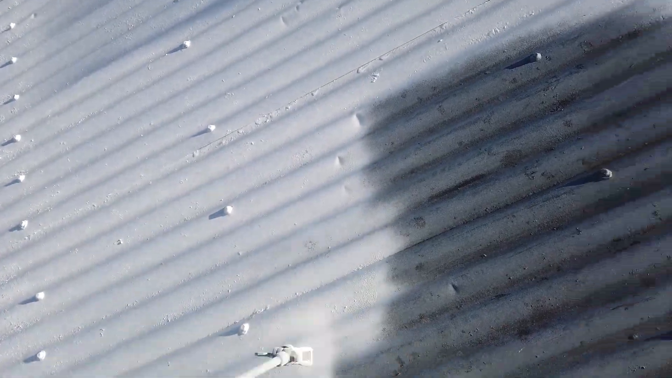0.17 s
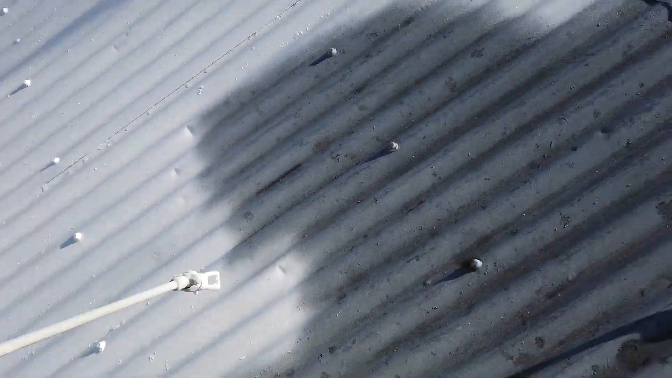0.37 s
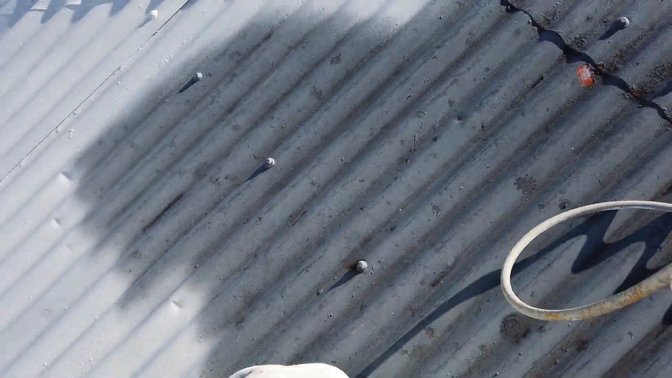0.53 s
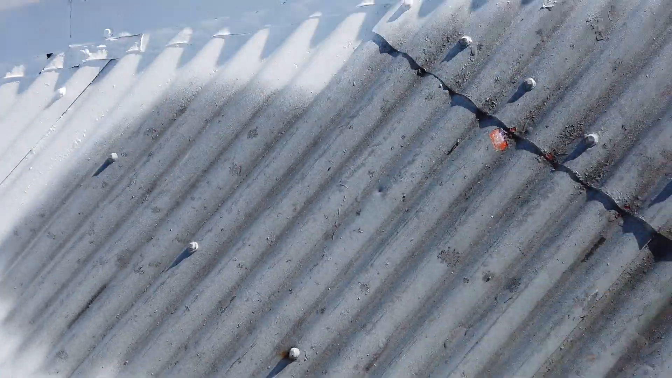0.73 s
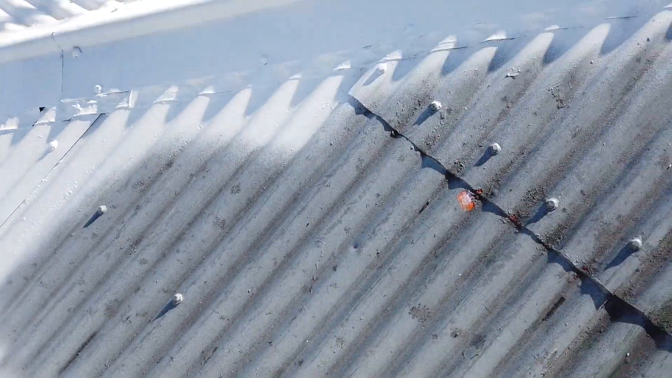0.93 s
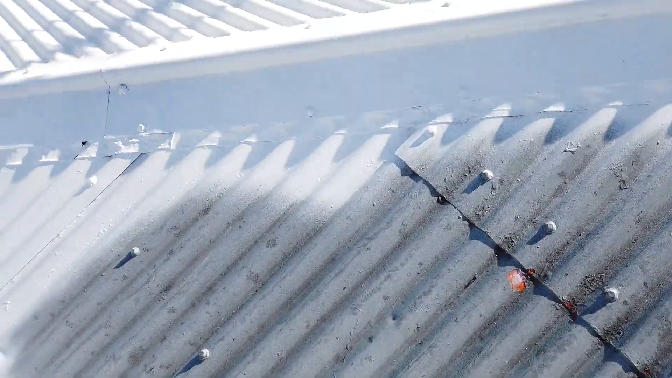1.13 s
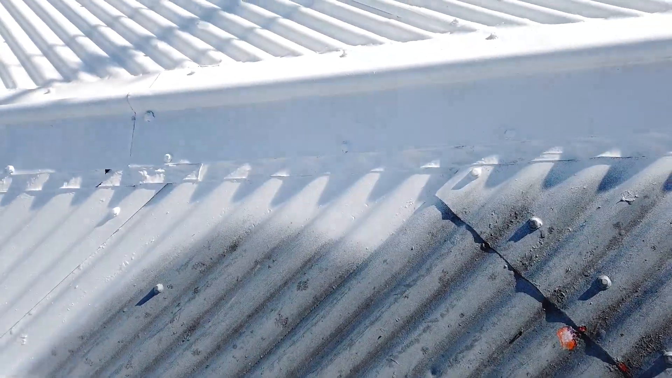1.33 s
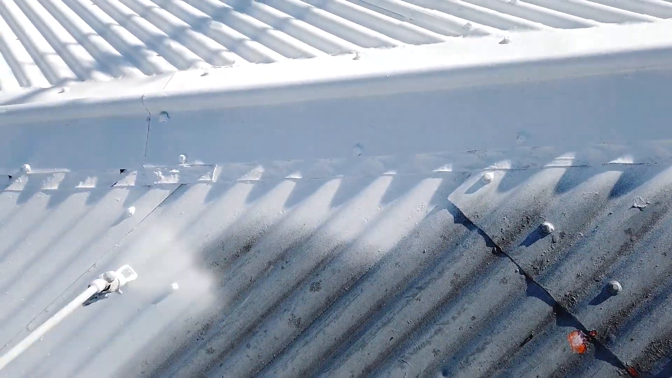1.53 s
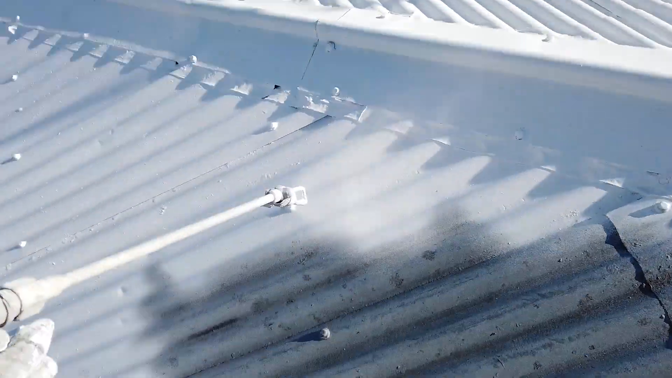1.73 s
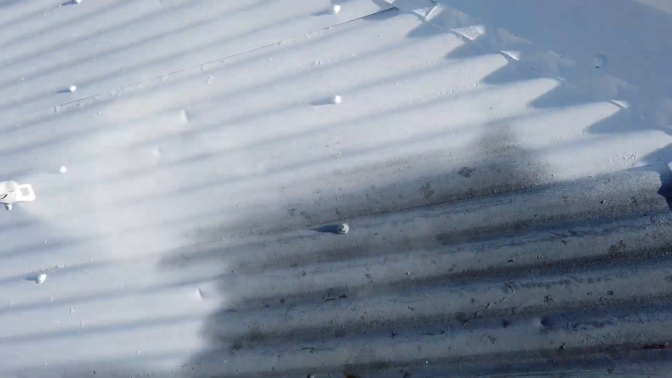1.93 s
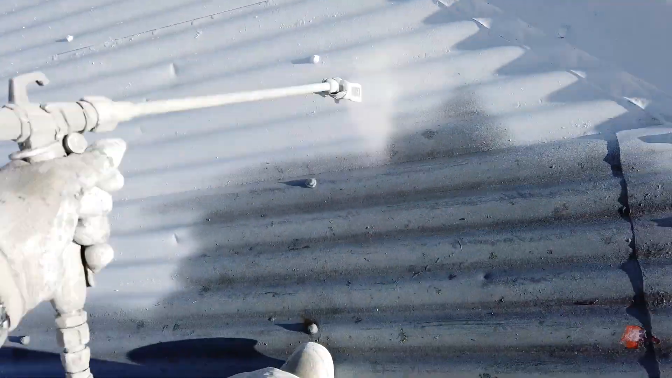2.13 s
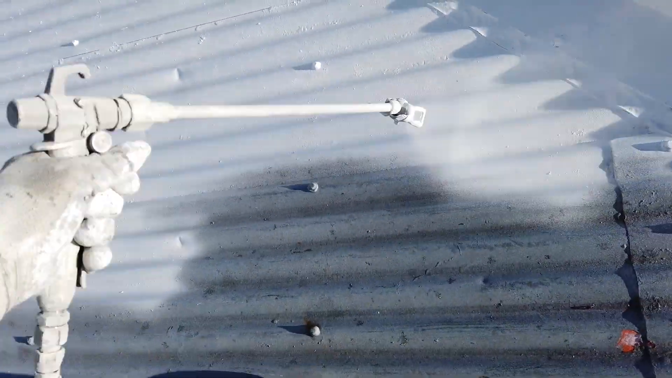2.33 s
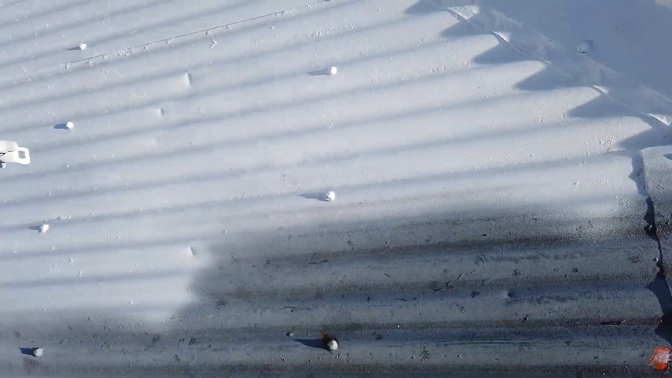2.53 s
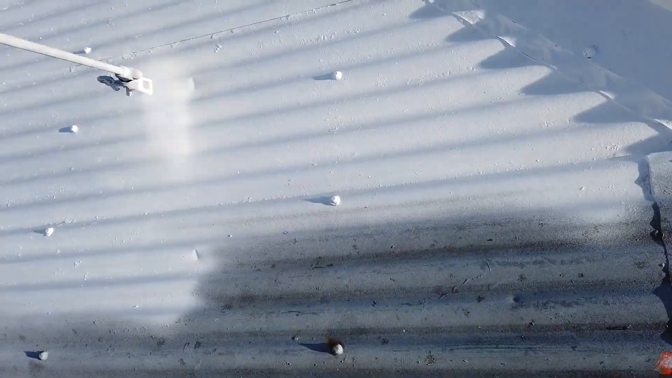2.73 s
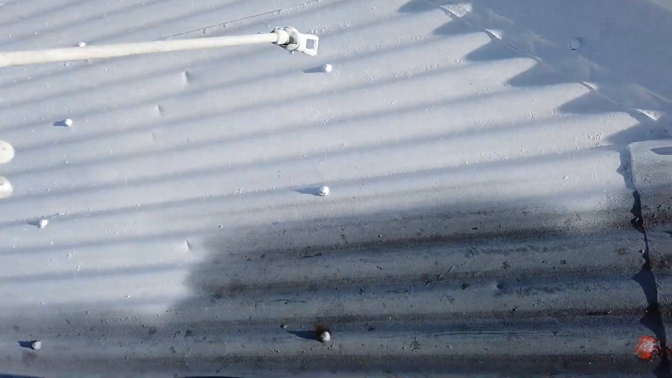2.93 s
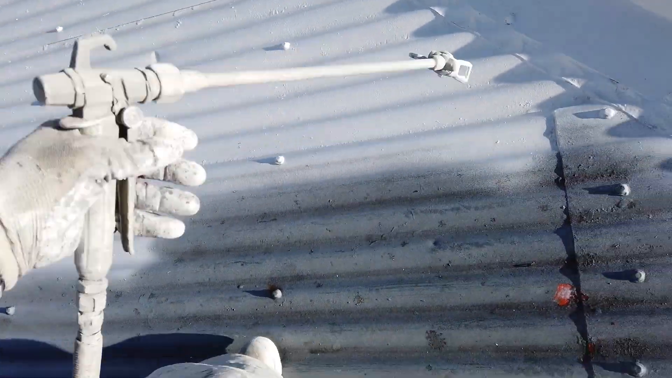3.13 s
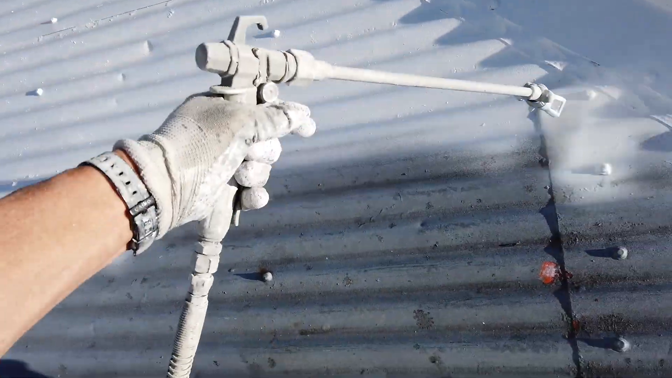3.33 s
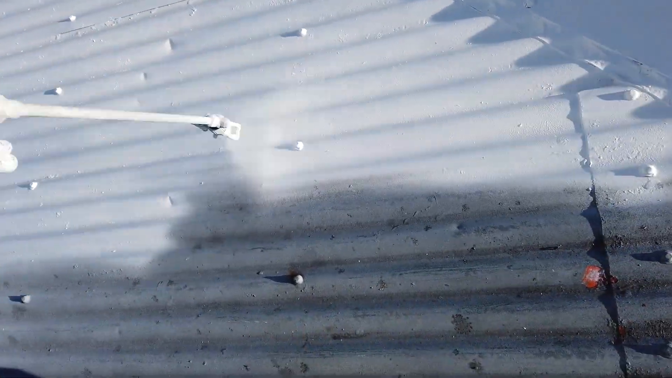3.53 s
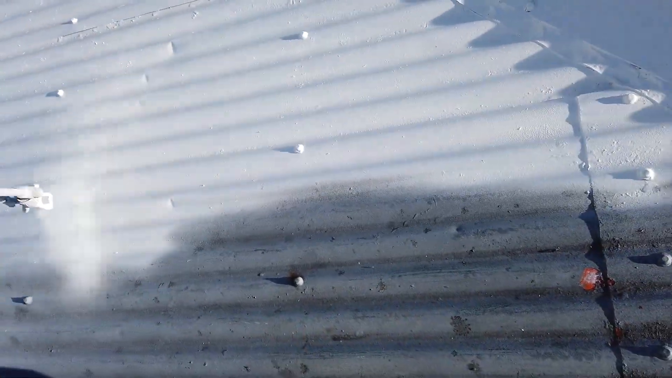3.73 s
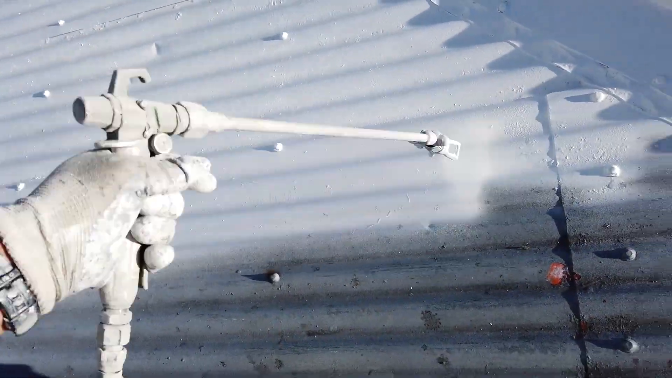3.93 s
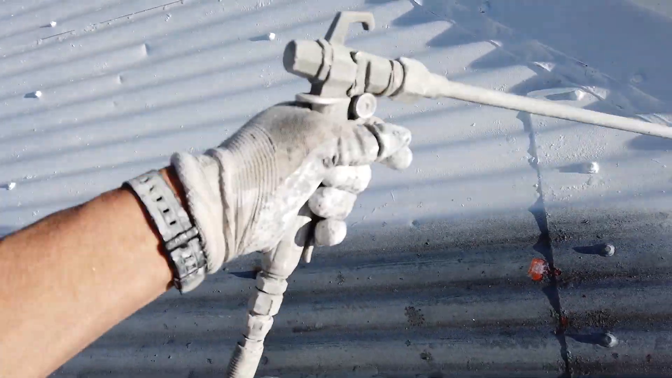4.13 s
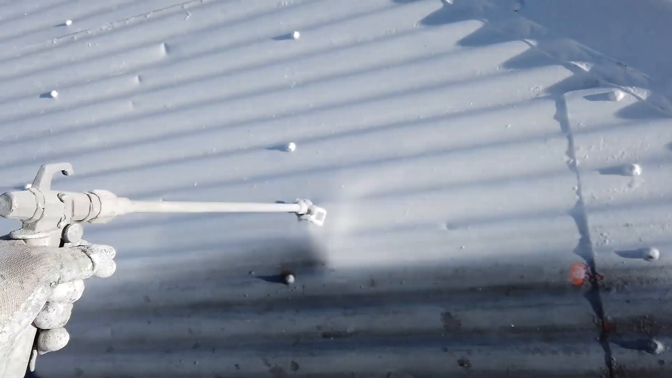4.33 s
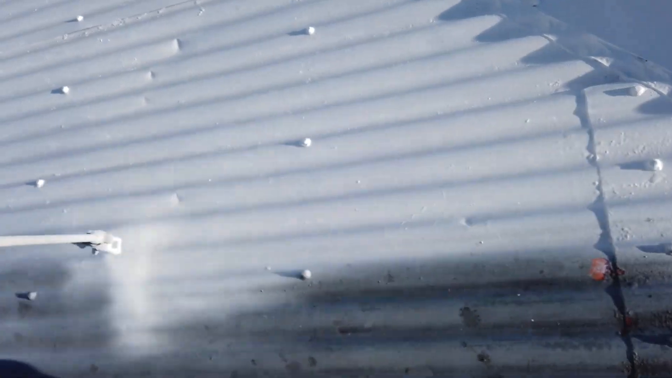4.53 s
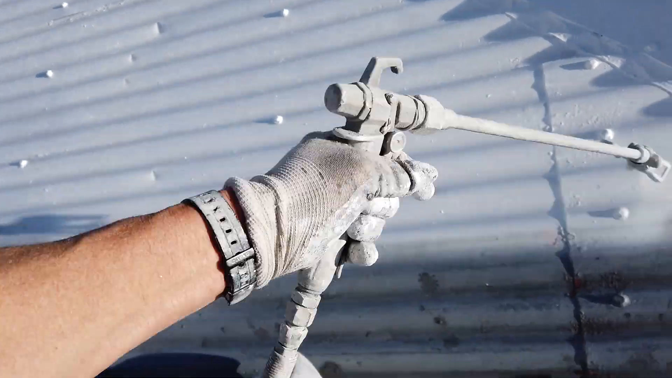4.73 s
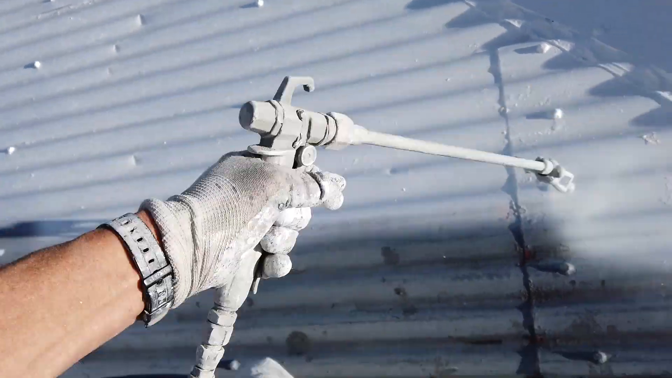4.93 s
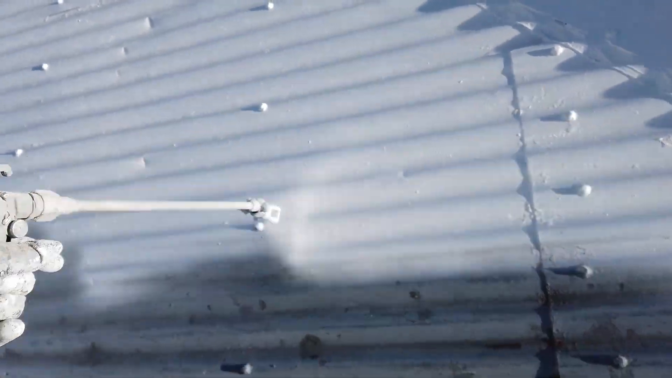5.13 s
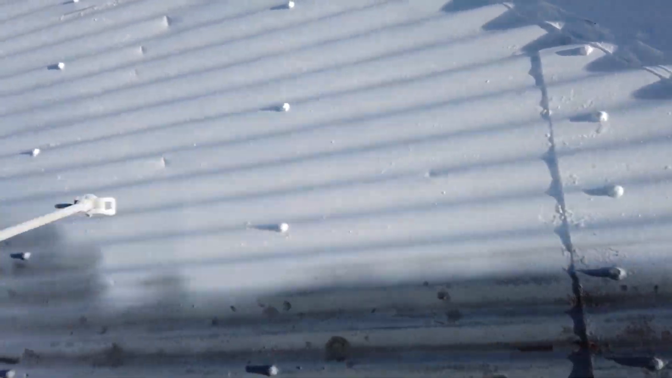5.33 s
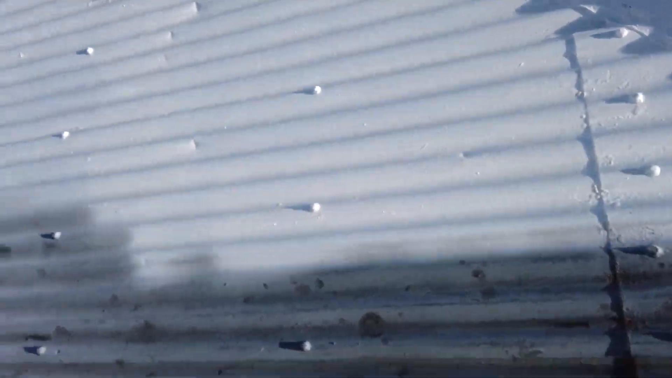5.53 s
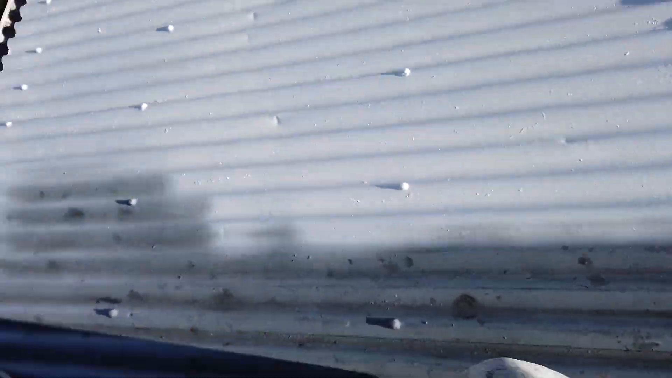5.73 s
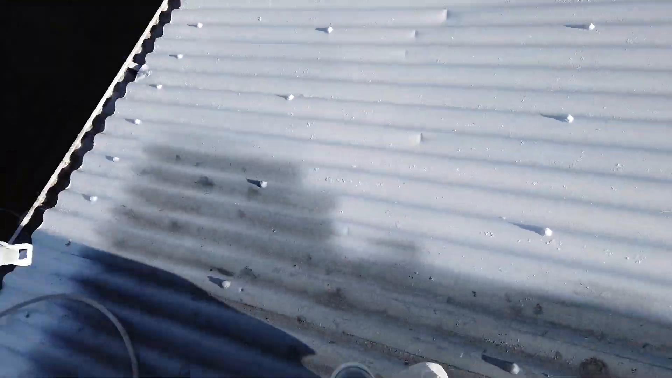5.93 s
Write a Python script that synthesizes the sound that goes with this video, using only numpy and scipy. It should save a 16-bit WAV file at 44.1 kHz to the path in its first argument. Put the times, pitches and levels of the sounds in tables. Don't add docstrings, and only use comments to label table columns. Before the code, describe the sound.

A bright, fierce paint-sprayer hiss comes in four clean bursts on a metal roof, with hose knocks between and heavy wind slapping the microphone at the end.

```python
import sys
import numpy as np
from scipy import signal
from scipy.io import wavfile
from scipy.ndimage import uniform_filter1d

SR = 44100
rng = np.random.default_rng(int(sys.argv[2]) if len(sys.argv) > 2 else 0)


def dump_mix(stems):
    frames = np.atleast_2d(stems).T
    limited = np.clip(frames, -1, 1)
    pcm = np.round(limited * 32767).astype(np.int16)
    wavfile.write(sys.argv[1], SR, pcm)


def natural_amplitude(level_db):
    exponent = np.asarray(level_db, float) / 20
    return 10 ** exponent


N = 268128
T = np.arange(N) / SR
EDGE_HZ = 15800

# time in seconds, strength in dB, sharpness 0-1.
BREEZE = [(0, -55, 0.87), (.5, -57, 0.74), (.85, -51, 0.89), (1.1, -48, .7), (1.35, -50, 0.2),
          (1.5, -52.5, 0.6), (1.65, -62.5, 0.92), (2.1, -57, 0.83), (2.5, -60.5, 1), (2.8, -56, 0.87),
          (3.1, -59.5, 0.49), (3.4, -45.5, 0.41), (3.9, -60, 0.7), (4.2, -53.5, 0.57), (4.4, -41, 0.04),
          (4.7, -57, 0.5), (5.6, -51.5, 0.64), (6.08, -38.5, 0.05)]
# peak in seconds, strength in dB, sharpness 0-1, length in seconds.
GUSTS = [(0.181, -47, 0.4, 0.043), (0.506, -46.5, 0.3, 0.055), (1.113, -44, 0.3, 0.025),
         (1.532, -50, 1, .05), (2.368, -43.5, 0, 0.046), (3.033, -60, 0.1, .03), (4.804, -35, 0, 0.046),
         (3.419, -35, 0.37, 0.025), (3.45, -47, 1.0, 0.08), (3.55, -37.5, 0.85, 0.035),
         (4.274, -40.5, 0.8, 0.061), (4.357, -49, 1, 0.061), (4.44, -45, 0.97, 0.081),
         (4.842, -35.5, 0.95, 0.049), (4.889, -33.5, 0.21, 0.029), (4.954, -33, 0.49, 0.02),
         (5.055, -38.5, 0, 0.068), (5.102, -28.5, 0.31, 0.031), (5.276, -43, 0.7, 0.067),
         (5.43, -36, 0.05, 0.043), (5.496, -45.5, 0.85, 0.023), (5.567, -30, 0.05, 0.018),
         (5.706, -37.5, 0.8, 0.017), (5.766, -26.5, 0.72, 0.037), (5.79, -19.5, 0.38, 0.07),
         (5.835, -17, 0.76, 0.046), (5.878, -15, 0.79, 0.019), (5.907, -16, 0.78, 0.019),
         (5.977, -29.5, 0.16, 0.096), (6.03, -28.5, 0.2, 0.1)]
# peak in seconds, strength in dB, sharpness, length in seconds.
JOLTS = [
    (0.933, -44, 1.15, 0.06),
    (0.958, -37.5, 1.1, 0.12),
    (1.004, -38.5, 1.08, 0.047),
    (1.18, -35.5, 1.18, 0.05),
    (1.216, -36, 0.6, 0.045),
]


def evened(x):
    return x / np.sqrt(np.mean(x ** 2) + 1e-20)


def read(points, hz):
    f, value = np.transpose(points)
    return np.interp(np.log(hz + 1), np.log(f + 1), value)


def column(rows, index, t, outside=None):
    rows = np.asarray(rows)
    return np.interp(t, rows[:, 0], rows[:, index], outside, outside)


def grid(size):
    hop = size // 4
    return np.fft.rfftfreq(size, 1 / SR)[:, None], np.arange(-(-N // hop) + 1) * hop / SR


def patches(shape, bins, frames):
    field = rng.standard_normal(shape[::-1]).T
    for _ in range(2):
        field = uniform_filter1d(uniform_filter1d(field, bins, 0), frames, 1)
    return evened(field)


def unit(shape_db, hz, lo_hz, hi_hz):
    gain = natural_amplitude(shape_db)
    return gain / np.sqrt((gain ** 2 * (hz > lo_hz) * (hz < hi_hz)).mean(0))


def coloured(x, gain, size):
    z = signal.stft(x, nperseg=size, noverlap=3 * size // 4)[2]
    return signal.istft(z * gain[:, :z.shape[1]], nperseg=size, noverlap=3 * size // 4)[1][:N]


def lumpy(lump_db, size):
    lumps = uniform_filter1d(uniform_filter1d(rng.standard_normal(N), size), size)
    return evened(rng.standard_normal(N) * natural_amplitude(lump_db * evened(lumps)))


def resonate(x, hz, width_hz):
    turn = np.exp(2j * np.pi * np.cumsum(hz * np.ones(len(x))) / SR)
    r = np.exp(-np.pi * width_hz / SR)
    return (turn * signal.lfilter([(1 - r) ** 2], [1, -2 * r, r * r], x / turn)).real


def peaks_db(t, at_s, peak_db, rise_s, fall_s):
    late = t[:, None] - at_s
    each_db = peak_db - 10 * np.maximum(late / abs(fall_s), -late / abs(rise_s))
    return 10 * np.log10((natural_amplitude(each_db) ** 2).sum(1) + 1e-14)


def trigger_db():
    # trigger pulled in seconds, let go in seconds.
    trigger = [
        (-.1, 0.3555),
        (1.473, 2.591),
        (2.789, 2.95),
        (3.378, 5.392),
    ]
    open_db_per_s, bleed_db_per_s, shut_s = 6497.5, 3000, 0.003
    bursts_db = []
    for on, off in trigger:
        opening_db = np.minimum(open_db_per_s * (T - on), 0)
        bleed_db = np.minimum(bleed_db_per_s * (off - T), 0)
        seat_db = np.minimum(open_db_per_s * (off + shut_s - T), 0)
        bursts_db.append(opening_db + bleed_db + seat_db)
    return np.max(bursts_db, axis=0)


def spray():
    # time in seconds, fan level in dB, fan resonance in Hz, facing the ridges in dB.
    sweeps = [
        [(0.0, -37.5, 11000, -1.5), (0.042, -37.5, 11500, -6.5), (0.054, -40, 11400, -2.5),
         (0.198, -34, 11300, -7.5), (0.324, -30.5, 11740, -3.5), (0.358, -27.5, 11200, -7)],
        [(1.485, -29.5, 11600, -12), (1.547, -32, 11150, -5.5), (1.725, -30.5, 11200, -9.5),
         (1.771, -29, 11300, -5), (1.943, -32.5, 11400, -5.5), (2.03, -36, 11500, -1)],
        [(2.06, -36.5, 11600, -2), (2.122, -30, 11400, -9), (2.168, -34, 11400, 0), (2.254, -28, 11800, -9),
         (2.286, -30.5, 11200, -2.5), (2.348, -30, 11600, -8.5), (2.504, -31, 11200, -3),
         (2.57, -33, 11600, -8.5), (2.585, -32.5, 11800, -3.5)],
        [(2.8, -35, 11400, -10), (2.842, -29.5, 11500, -10), (2.894, -31, 10900, -6), (2.945, -30, 11600, -7.5)],
    ]
    long_sweeps = [
        [(3.39, -30, 11400, -3.5), (3.404, -25.5, 11300, -5), (3.418, -24.5, 12040, -10),
         (3.582, -29.5, 10500, -14.5), (3.612, -30.5, 11200, -9.5), (3.82, -40, 10900, -5)],
        [(3.85, -36, 11000, -5), (3.922, -33, 11800, -3), (3.956, -28, 11300, -9.5), (4.142, -30, 11300, -7.5),
         (4.212, -31.5, 12500, -2.5), (4.3, -28, 11200, -8.5), (4.352, -30.5, 12100, -2),
         (4.452, -31.5, 11400, -6.5), (4.5, -36, 11300, -2)],
        [(4.53, -37.5, 11300, -5), (4.648, -33.5, 11900, -8), (4.728, -29, 10600, -10), (4.802, -31, 11260, -5),
         (5.022, -29, 11850, -7), (5.128, -32.5, 11000, -5), (5.246, -33, 10750, -9.5),
         (5.302, -32.5, 11700, -3), (5.385, -31.5, 10900, -13)],
    ]
    # frequency in Hz, density in dB per Hz.
    echo_shape = [(4500, -32), (6500, -4.5), (8200, 5.5), (9500, 1.5), (12000, -26.5)]
    splash_shape = [(700, -35.5), (1500, -18), (2500, -4.5), (4000, -1.5), (5500, 3.5), (8000, -0.5),
                    (12000, -13.5)]
    mist_shape = [(9000, -24.5), (12500, 7), (13800, 9), (15800, 5), (17000, -21.5)]
    fan_mid_db = -32
    splash_mid_db, splash_follows = -46.5, 0.46
    mist_mid_db, mist_follows, mist_waver_db = -37, 0.62, 3

    hz, t = grid(size=512)
    rows = np.concatenate(sweeps + long_sweeps)
    fan_db, fan_hz, echo_db = (column(rows, k, t) for k in range(1, 4))
    nearness_db = fan_db - fan_mid_db
    splash_db = splash_mid_db - fan_mid_db - (1 - splash_follows) * nearness_db
    mist_db = mist_mid_db - fan_mid_db - (1 - mist_follows) * nearness_db
    mist_db = mist_db + mist_waver_db * patches((1, len(t)), bins=1, frames=25)

    fan = unit(-10 * np.log10(1 + ((hz - fan_hz) / 1300) ** 4), hz, 9500, 14800)
    echo = natural_amplitude(echo_db - 0.5) * unit(read(echo_shape, hz), hz, 6500, 9470)
    splash = natural_amplitude(splash_db + 0.78) * unit(read(splash_shape, hz), hz, 2200, 6500)
    mist = natural_amplitude(mist_db - 1.0) * unit(read(mist_shape, hz), hz, 12000, EDGE_HZ)
    power = fan ** 2 + echo ** 2 + splash ** 2 + mist ** 2

    shimmer_db = 0.75 * patches(power.shape, bins=6, frames=20)
    shimmer_db += 0.61 * patches(power.shape, bins=14, frames=45)
    gain = np.sqrt(power) * natural_amplitude(fan_db - 0.26 + shimmer_db)
    return coloured(lumpy(0.34, size=50), gain, size=512) * natural_amplitude(trigger_db())


def wind_db(t, breeze_db, soft_db, short):
    s, db, _, length_s = np.transpose(GUSTS + JOLTS)
    fall_s = short * length_s * 10 / 12.5
    gust_rise, jolt_rise = 0.81, 0.086
    rise_s = fall_s * np.repeat([gust_rise, jolt_rise], [len(GUSTS), len(JOLTS)])
    gusts_db = peaks_db(t, s, db + soft_db, rise_s, fall_s)
    return 20 * np.log10(np.hypot(natural_amplitude(gusts_db), natural_amplitude(column(BREEZE, 1, t) + breeze_db)))


def wind():
    sharp = np.transpose(GUSTS + JOLTS)[2]

    hz, t = grid(size=2048)
    buffet_shape_db = -10 * np.log10(1 + (hz / 36) ** 2.51 + (hz / 110) ** 6 + (22 / (hz + 1)) ** 6)
    buffet_db = wind_db(t, 0, -3 * sharp, 1.0)
    buffet = unit(buffet_shape_db, hz, 25, 110) * natural_amplitude(buffet_db - 0.36)
    low = coloured(lumpy(0.62, size=900), buffet, size=2048)

    hz, t = grid(size=512)
    flutter_shape_db = -10 * np.log10((hz / 200 + 0.089) ** 2.04 + (hz / 380) ** 7 + (110 / (hz + 1)) ** 6)
    roar_shape_db = -10 * np.log10((hz / 500 + 0.057) ** 2.65 + (hz / 1400) ** 9 + (400 / (hz + 1)) ** 6)
    soft_db = -16 * (1 - column(BREEZE, 2, t))
    flutter_db = wind_db(t, 5 + soft_db, -34.5 * np.maximum(.5 - sharp, 0), 0.79)
    roar_db = wind_db(t, -7 + soft_db, -49 * (1 - sharp), 0.69)
    flutter = unit(flutter_shape_db, hz, 110, 400) * natural_amplitude(flutter_db - 5.5)
    roar = unit(roar_shape_db, hz, 400, 1300) * natural_amplitude(roar_db - 8.5)
    return low + coloured(lumpy(2.0, size=200), np.hypot(flutter, roar), size=512)


def air():
    # frequency in Hz, density in dB per Hz.
    hush = [(500, -20), (900, -4), (2200, -6), (3000, -13), (4500, -17.5), (6500, -26), (9000, -29),
            (12700, -29), (13200, -70)]
    # start in seconds, end in seconds, pitch in Hz, width in Hz, level in dB.
    whines = [
        (1.22, 1.47, 13300, 300, -91),
        (5.48, 6.2, 13250, 300, -82),
        (0, 6.2, 8350, 300, -95),
        (2.62, 3.4, 2200, 40, -75),
    ]
    # time in seconds, pitch in Hz, level in dB.
    whistle_curve = [(5.74, 2040, -68), (5.9, 2136, -61), (5.922, 2200, -45), (5.947, 2400, -44),
                     (5.972, 2780, -45.5), (6.005, 2500, -44.5), (6.04, 2250, -45), (6.08, 2100, -52)]
    # centre in seconds, level in dB, pitch in Hz, length in seconds.
    ticks = [
        (3.277, -68.5, 11500, 0.0063),
        (.822, -77, 11500, .012),
        (5.875, -73, 12000, 0.0254),
        (.932, -48, 5500, 0.0044),
        (.997, -61, 5800, 0.014),
    ]

    hz, t = grid(size=1024)
    shape_db = read(hush, hz) + 0.73 * patches((len(hz), len(t)), bins=9, frames=12)
    out = coloured(rng.standard_normal(N), unit(shape_db, hz, 1000, 12000) * natural_amplitude(-70.5), size=1024)
    for start, end, whine_hz, width_hz, db in whines:
        fade = np.clip(np.minimum(T - start, end - T) / .04, 0, 1)
        on = fade > 0
        whine = evened(resonate(rng.standard_normal(on.sum()), whine_hz, width_hz))
        out[on] += natural_amplitude(db) * fade[on] * whine
    whistle = evened(resonate(rng.standard_normal(N), column(whistle_curve, 1, T), 540))
    out += whistle * natural_amplitude(column(whistle_curve, 2, T, -120) - 9.5)
    for s, db, tick_hz, length_s in ticks:
        near = abs(T - s) < .1
        tick = evened(resonate(rng.standard_normal(near.sum()), tick_hz, 3000))
        out[near] += natural_amplitude(db) * np.exp(-((T[near] - s) / length_s) ** 2) * tick
    return out


def scuffs():
    # peak in seconds, scuff level in dB, rustle against it in dB, fade in seconds.
    strokes = [
        [(.53, -60, -11.5, 0.11), (.61, -61.5, -13, 0.099), (.7, -67, -16, 0.11), (.81, -64, -16.5, 0.13),
         (.93, -38, -30, .012), (.964, -48, -22, 0.02), (.985, -48, -16, 0.013), (1.014, -44, -32, 0.0045),
         (1.04, -62, -21, 0.11), (1.178, -49, -24, 0.025), (1.2, -54, -21, 0.017), (1.25, -65.5, -18, 0.53)],
        [(5.552, -65.5, -16, 0.58), (5.70, -60, -27.5, 0.035), (5.743, -47, -44, .03),
         (5.778, -43.5, -39, 0.032), (5.817, -55.5, -23, 0.044), (5.865, -57, -24.5, .035),
         (5.905, -46, -43, .008), (5.93, -64, -14, 0.31), (6.07, -61, -11, .03)],
    ]
    scrape_top_hz = [5500, 2100]
    rise_s = 0.0028

    hz, t = grid(size=256)
    bright_shape_db = -10 * np.log10(1 + ((hz - 11200) / 2500) ** 2 + (hz / 13500) ** 30)
    bright = unit(bright_shape_db, hz, 8500, 13000)
    power = 0
    for rows, top_hz in zip(strokes, scrape_top_hz):
        dull_shape_db = -10 * np.log10((hz / 2000 + 0.074) ** 3.9 + (hz / top_hz) ** 12 + (1100 / (hz + 1)) ** 5)
        dull = unit(dull_shape_db, hz, 1400, 4500)
        s, db, rustle_db, fade_s = np.transpose(rows)
        rustle_fade_s = np.minimum(1.5 * fade_s, .2)
        power += (dull * natural_amplitude(peaks_db(t, s, db - 4.0, rise_s, fade_s))) ** 2
        power += (bright * natural_amplitude(peaks_db(t, s, db + rustle_db, rise_s, rustle_fade_s))) ** 2
    return coloured(lumpy(2.0, size=90), np.sqrt(power), size=256)


def knocks():
    # start in seconds, peak in dB, ring in Hz, t60 in seconds, share of rattle 0-1.
    hose_knocks = [(0.9291, -21, 1530, 0.031, 0.11), (.9275, -30, 2400, .045, .8),
                   (.94, -32, 1400, 0.052, 1), (.960, -22.5, 1620, 0.064, 0.8),
                   (0.974, -23.5, 800, 0.077, 0.9), (1.007, -23, 1680, 0.029, 1),
                   (1.036, -29.5, 990, 0.044, 0.8), (1.173, -26, 1510, 0.048, 0.66),
                   (1.177, -33, 700, 0.043, 1), (1.182, -31, 1580, 0.045, 1),
                   (1.187, -25.5, 466, 0.034, 0.63), (1.205, -25, 1200, 0.037, 0.8)]
    thuds = [
        (1.003, -24, 127, 0.063, 0.05),
        (1.103, -29, 130, 0.038, 0.1),
        (1.204, -15.5, 340, 0.018, 0.084),
        (1.212, -15.5, 54.3, 0.098, 0.044),
        (3.027, -32.5, 166.5, 0.02, 0.11),
        (5.87, -8.5, 301, 0.023, 0.12),
        (5.851, -11.5, 230, 0.033, 0.18),
    ]
    out, t = np.zeros(N), np.arange(6000) / SR
    for s, peak_db, hz, t60_s, rattle in hose_knocks + thuds:
        band = signal.butter(3, [hz * .5, hz * 2], "band", fs=SR)
        rasp = evened(signal.lfilter(*band, rng.standard_normal(len(t))))
        hit = (1 - rattle) * np.sin(2 * np.pi * hz * t) + 0.35 * rattle * rasp
        rise_s = 0.00097 + 0.006 * rattle
        hit *= natural_amplitude(peak_db - 60 * t / t60_s) * np.clip(t / rise_s, 0, 1)
        start = round(s * SR)
        out[start:][:len(t)] += hit[:N - start]
    return out


def pump():
    # start in seconds, end in seconds, level in dB.
    spells = [
        (1.3, 1.55, -61.5),
        (1.578, 2.402, -60.5),
        (3.596, 4.2, -64),
    ]
    # multiple of the shaft speed, level in dB.
    orders = [(2, -5), (3, -8), (4, 0), (5, -10)]
    shaft_hz, waver_hz = 57.2, .3
    waver = evened(uniform_filter1d(rng.standard_normal(N), size=12000))
    turns = 2 * np.pi * np.cumsum(shaft_hz + waver_hz * waver) / SR
    hum = sum(natural_amplitude(db) * np.sin(order * turns) for order, db in orders)
    level = 0
    for start, end, db in spells:
        level = level + natural_amplitude(db + 1.5) * np.clip(np.minimum(T - start, end - T) / 0.09, 0, 1)
    return hum * level


def slaps():
    # start in seconds, peak in dB, t60 in seconds, top in Hz.
    puffs = [(4.251, -43, 0.05, 900), (4.82, -29, 0.056, 900), (4.837, -28.5, .05, 1170),
             (4.949, -50, 0.04, 600), (5.502, -34.5, 0.056, 750.2), (5.54, -42.5, 0.04, 916),
             (5.554, -37, 0.088, 603), (5.699, -24, 0.069, 650), (5.742, -23, 0.053, 1600),
             (5.755, -21, 0.051, 1300), (5.767, -23.5, 0.054, 905), (5.777, -18.5, 0.046, 1500),
             (5.789, -21, 0.026, 1500), (5.8, -30, 0.045, 800), (5.811, -23, 0.052, 1500),
             (5.819, -15, 0.063, 1720), (5.829, -17, 0.064, 1900), (5.841, -16.5, 0.064, 1290),
             (5.853, -21.5, 0.041, 1790), (5.872, -6.5, 0.026, 1700), (5.881, -12.5, 0.05, 1200),
             (5.895, -18, 0.026, 1900), (5.909, -10.5, 0.026, 1200), (6.011, -23, 0.054, 600),
             (6.042, -36, .05, 550)]
    low_hz, slope_hz, rise_s = 166, 380, 0.0024
    out, t = np.zeros(N), np.arange(6000) / SR
    for s, peak_db, t60_s, top_hz in puffs:
        band = signal.butter(5, [low_hz, top_hz], "band", fs=SR, output="sos")
        puff = signal.sosfilt(band, rng.standard_normal(len(t)))
        puff = evened(signal.lfilter(*signal.butter(1, slope_hz, fs=SR), puff))
        puff *= natural_amplitude(peak_db - 8.5 - 60 * t / t60_s) * np.minimum(t / rise_s, 1)
        start = round(s * SR)
        out[start:][:len(t)] += puff[:N - start]
    return out


def scene():
    mono = spray() + wind() + air() + scuffs() + knocks() + pump() + slaps()
    return np.tile(mono, (2, 1))


def roll_off(x):
    return signal.sosfilt(signal.butter(12, 16840, fs=SR, output="sos"), x)


def record(dry):
    hz, t = grid(size=1024)
    middle = signal.lfilter(*signal.butter(2, [500, 1800], "band", fs=SR), dry[0])
    power = abs(uniform_filter1d(middle ** 2, size=256))
    level_db = 10 * np.log10(np.interp(t, T, power) + 1e-12)
    attack = np.clip((np.roll(level_db, -2) - np.roll(level_db, 2) - 9) / 5, 0, 1)
    held = np.clip(3 * uniform_filter1d(attack, size=9), 0, 1)
    loose = 1 - .8 * held / (1 + (hz / 6000) ** 4)
    haste = np.clip(hz / 1500, .6, 1) * loose
    slow_band = abs(hz - 230) < 110
    quick = [patches(haste.shape, bins=9, frames=10) for _ in dry]
    drifted = []
    for x, q in zip(dry, quick):
        wander = 2.8 * haste * np.where(slow_band, 1.1 * uniform_filter1d(q, size=18), q)
        drifted.append(coloured(x, np.exp(1j * wander) * (hz < EDGE_HZ), size=1024))
    return roll_off(np.array(drifted) * natural_amplitude([[3.7], [3.4]]))


dry = scene()
out = record(dry)
dump_mix(out)
```